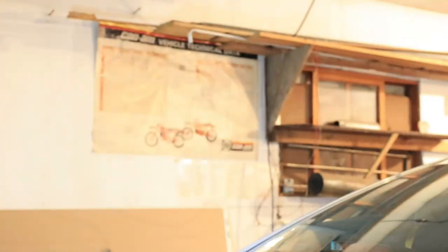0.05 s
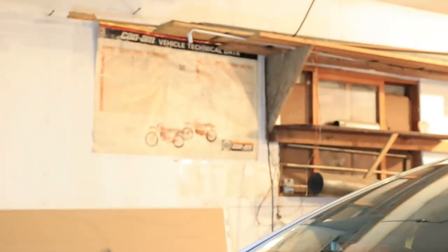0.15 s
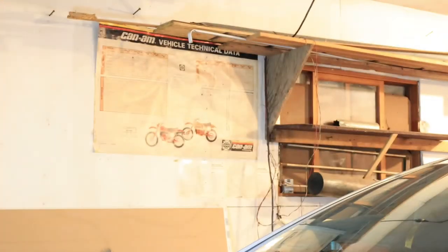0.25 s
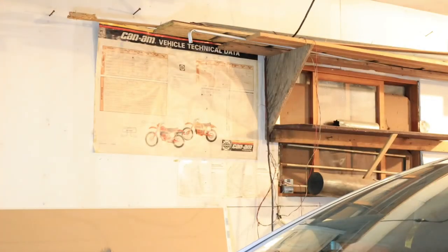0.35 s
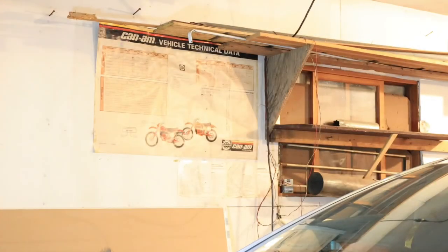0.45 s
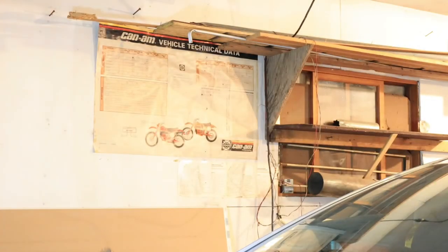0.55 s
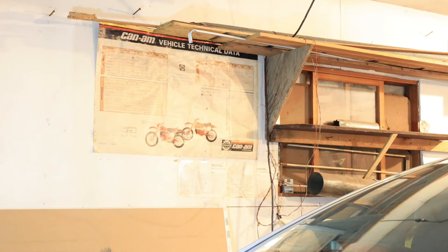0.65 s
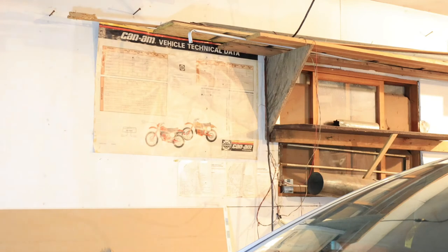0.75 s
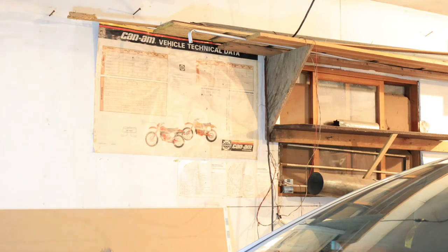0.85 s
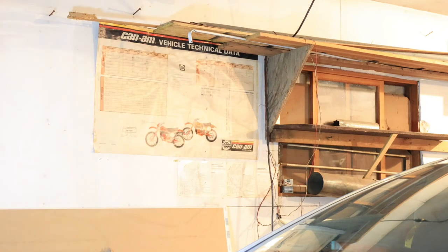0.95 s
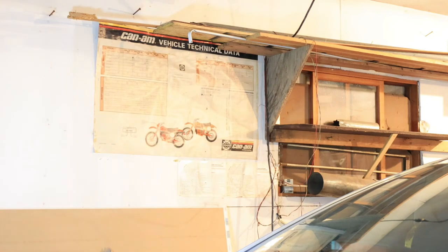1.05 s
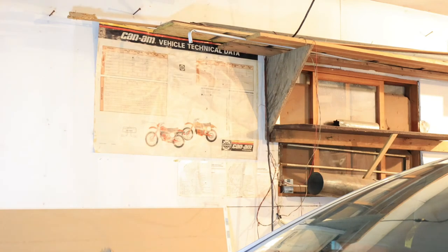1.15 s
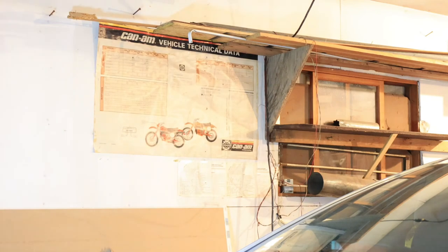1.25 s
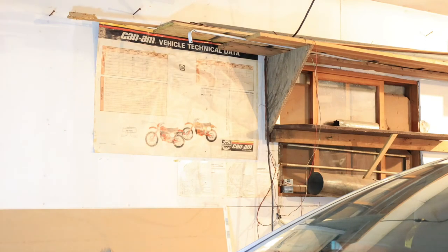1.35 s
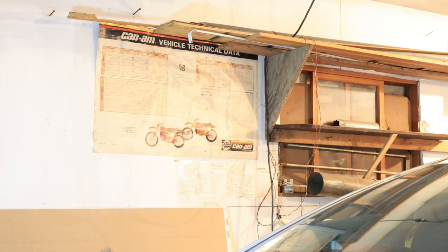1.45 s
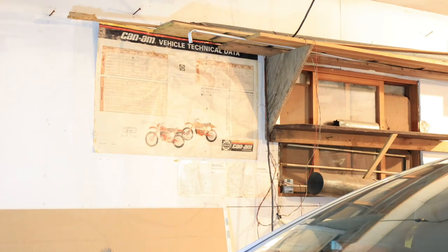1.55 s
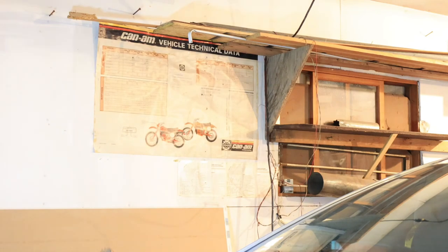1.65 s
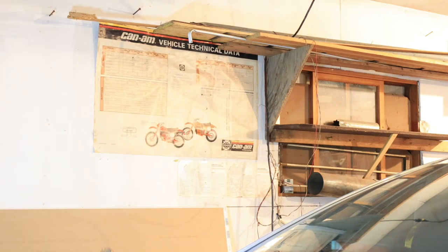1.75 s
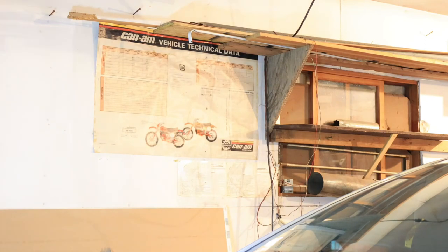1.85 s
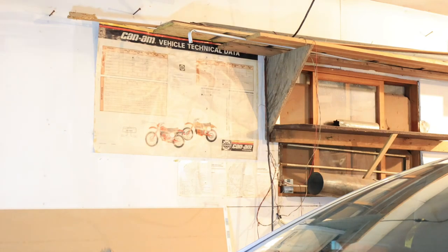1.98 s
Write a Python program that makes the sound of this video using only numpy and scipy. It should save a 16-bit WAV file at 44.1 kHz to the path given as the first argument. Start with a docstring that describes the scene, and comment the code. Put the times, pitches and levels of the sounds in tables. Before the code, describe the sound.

A car trunk lid slams almost at once after a faint rush of air: sharp latch clack, deep body thud, quick loose rattle, then short garage echo and near silence, picked up by one microphone in the left channel.

```python
"""In a quiet garage, a car trunk lid swings down and slams; room tone, rumble and thin hisses lie behind it.
The background is coloured noise, and the rush before the slam is noise with a drawn level.
Latch and loose part are bursts of dense clicks; the lid is a row of soft pushes that ring its panels.
A noise tail gives the garage echo. One microphone feeds the left channel;
the right holds preamp hiss and a faint bassy leak of the left."""
import sys
import numpy as np
from scipy import signal
from scipy.fft import rfft, irfft, next_fast_len
from scipy.io import wavfile
from scipy.ndimage import uniform_filter1d

SR = 44100
rng = np.random.default_rng(int(sys.argv[2]) if len(sys.argv) > 2 else 0)


def master_out(mix):
    """Clip the mix to full scale and print it as 16-bit PCM to the path in sys.argv[1]."""
    frames = np.transpose(np.atleast_2d(mix))
    ceiling = np.clip(frames, -1, 1)
    pcm = np.round(ceiling * 32767).astype(np.int16)
    wavfile.write(sys.argv[1], SR, pcm)


N = 88200
T = np.arange(N) / SR  # time in s


def undb(db):
    """Amplitude factor of a level in dB."""
    return 10 ** (np.asarray(db, float) / 20)


def table(hz, points, col=1):
    """Column of a table read on a log-frequency axis."""
    p = np.array(points, float)
    return np.interp(np.log(np.maximum(hz, 1)), np.log(p[:, 0]), p[:, col])


def colour(x, points):
    """Equalise a sound by (freq_hz, gain_db) points."""
    size = next_fast_len(len(x) + 4096)
    gain = undb(table(np.fft.rfftfreq(size, 1 / SR), points))
    return irfft(rfft(x, size) * gain, size)[:len(x)]


def unit(x):
    """Scale to an RMS of 1."""
    return x / np.sqrt(np.mean(x ** 2))


def noise(points):
    """Coloured noise with an RMS of 1."""
    return unit(colour(rng.standard_normal(N), points))


def curve(rows):
    """Amplitude drawn by straight dB lines through (time_s, level_db) rows."""
    r = np.array(rows, float)
    return undb(np.interp(T, r[:, 0], r[:, 1]))


def walk(rate):
    """Slewed random levels, rate steps a second, spread 1."""
    k = int(SR / rate)
    steps = np.repeat(rng.standard_normal(N // k + 1), k)
    return unit(uniform_filter1d(steps, k)[:N])


# colour of the room tone: freq_hz, gain_db
ROOM_TONE_COLOUR = [(20, -14), (60, -11), (120, -5.5), (195, 0), (290, -12), (360, -4), (470, -11),
                    (560, -9), (1200, -15.5), (2500, -23.5), (4000, -22.5), (7000, -45)]
ROOM_TONE_DB = -73  # RMS before the mic gain


def room_tone():
    """Steady garage air: noise weighted toward the low end."""
    return noise(ROOM_TONE_COLOUR) * undb(ROOM_TONE_DB)


# colour of small movements of cloth and car: freq_hz, gain_db
STIR_COLOUR = [(59, -30), (100, 0.5), (401, -9), (564, -0.5), (768, -17.5), (1350, -8), (2220, -20.5),
               (3590, -18), (6000, -30.5), (7800, -60.5), (13200, -120)]
# their loudness: time_s, level_db (before the mic gain)
STIR_LEVEL = [(.3, -89.5), (.6, -70), (.75, -64), (.8, -59.5), (.95, -70), (.995, -64.5), (1.1, -73),
              (1.22, -83.5), (1.3, -76), (1.45, -101), (1.55, -77), (1.65, -71), (1.75, -79.5), (1.9, -82),
              (2, -79.5)]


def stirring():
    """Small movements of cloth and car: friction noise that swells and sinks."""
    return noise(STIR_COLOUR) * curve(STIR_LEVEL)


# band of the low rumble, strongest at 83 Hz: freq_hz, gain_db
RUMBLE_COLOUR = [(30, -14), (65, -10), (83, 1), (100, -9.5), (140, -27), (500, -89.5)]
# its loudness: time_s, level_db (before the mic gain)
RUMBLE_LEVEL = [(0, -71.5), (.12, -82.5), (.38, -58.5), (.65, -65), (.9, -67.5), (1.05, -70), (1.25, -74),
                (1.45, -68), (1.58, -75.5), (1.7, -63.5), (1.8, -64), (1.85, -69.5), (2, -66)]


def rumble():
    """Low rumble: a narrow band of noise with a drawn level."""
    return noise(RUMBLE_COLOUR) * curve(RUMBLE_LEVEL)


# faint narrow hisses and hums: start_s, length_s, centre_hz, width_hz, level_db (before the mic gain)
WHISPS = [(0, .1, 122.5, 24.3, -60.5), (0.037, 0.031, 3550, 517, -66), (.085, .08, 3297, 250, -78),
          (.085, .08, 2520, 200, -78), (0.658, 0.32, 3610, 301, -78), (0.717, 0.067, 4470, 240, -71),
          (0.784, 0.23, 1420, 200, -75.5), (0.768, 0.089, 549, 128, -73.5), (.96, .08, 560, 120, -73),
          (1.608, .06, 325, 99.5, -71), (1.51, 0.068, 1950, 201.5, -81.5), (1.764, 0.083, 4180, 400, -80.5),
          (1.783, 0.12, 3760, 400, -80.5), (1.8, 0.1, 3200, 446, -79.5)]
WHISP_WAVER_DB, WHISP_STEPS_PER_S = 2.5, 39.9


def whisps():
    """Narrow bands of noise that arch up and away while their level wavers."""
    out = np.zeros(N)
    for start_s, length_s, hz, width_hz, level_db in WHISPS:
        band = noise([(hz - 2 * width_hz, -60), (hz - width_hz / 2, 0),
                      (hz + width_hz / 2, 0), (hz + 2 * width_hz, -60)])
        level = undb(level_db + WHISP_WAVER_DB * walk(WHISP_STEPS_PER_S))
        arch = np.sin(np.pi * np.clip((T - start_s) / length_s, 0, 1))
        out += level * band * np.sqrt(arch + 1e-12)  # the tiny offset keeps the root real
    return out


# colour of the air pushed by the falling lid: freq_hz, gain_db
RUSH_COLOUR = [(59, -30.5), (100, -1.5), (147, -1), (193, -14.5), (279, -3), (698, -5.5), (919, -2.5),
               (1480, -15.5), (3320, -13), (8000, -40.5), (10400, -71.5), (17600, -120)]
# its loudness: time_s, level_db (before the fade and the mic gain)
RUSH_LEVEL = [(0, -62), (.04, -69), (.08, -62), (.115, -59.5), (.15, -60.5), (.162, -51.5)]


def air_rush():
    """Air pushed by the falling lid: turbulent noise, faded out from 0.17 to 0.2 s."""
    fade = np.clip((.2 - T) / .03, 0, 1)
    return noise(RUSH_COLOUR) * curve(RUSH_LEVEL) * fade


# echo of the garage: freq_hz, t60_s, level_db (relative)
GARAGE = [(60, 0.67, -11.5), (125, 0.63, -10.5), (252, .75, -8.5), (508, 0.91, -7), (1000, 0.73, -3.5),
          (2000, 0.81, -6), (2770, 0.52, -5.5), (3984, .68, -2), (5500, .48, -6), (8000, .38, -7.5),
          (13880, .27, -10)]
GARAGE_RISE_S = .008


def garage(x):
    """Diffuse echo: noise that builds up and dies away at its own pace in each half-octave band."""
    t = T[:int(1.3 * SR)]
    tail = 0
    for hz in 40 * 2 ** np.arange(0, 8.6, .5):
        band_pass = signal.butter(2, [hz / 1.19, hz * 1.19], "band", fs=SR, output="sos")
        band = signal.sosfilt(band_pass, rng.standard_normal(len(t)))
        t60 = table(hz, GARAGE)
        decay = undb(table(hz, GARAGE, col=2) - 60 * t / t60)
        tail = tail + band * decay / np.sqrt(t60 * SR / 14)  # offsets the extra energy of long decays
    rise = 1 - np.exp(-t / GARAGE_RISE_S)
    return signal.fftconvolve(x, tail * rise)[:N]


# contacts of latch and loose part: start_s, level_db (before the mic gain),
# decay_s (time constant, held to 0.001 or more), tilt_db_per_octave (brightness)
CLACKS = [(0.043, -55, 0.0054, 9), (.164, -31.5, 0.006, -4.5), (0.17, -34, 0.015, -2),
          (.178, -19, 0.012, -1.5), (0.1853, -13.5, 0.0059, 1.5), (0.1932, -33, 0.00587, -3.5),
          (0.1998, -23, 0.019, 0.5), (0.2101, -21.5, 0.013, -3), (0.2416, -22, 0.0089, 4),
          (.2544, -23, 0.009, -4.5), (0.2963, -24.5, 0.0054, 2), (0.3047, -24.5, 0.0034, 1.5),
          (0.3482, -28, 0.011, 0.5), (0.3569, -27, 0.006, -2), (0.394, -34, 0.0058, -0.5),
          (0.4428, -45, 0.0055, -9), (0.4855, -37.5, 0.0078, -3), (0.5207, -56, 0.001, 2),
          (0.5292, -41.5, 0.0071, -2), (0.983, -61.5, 0.0087, 2.5), (1.278, -69, 0.0099, 4),
          (1.9874, -65, .004, 14)]
# shared colour of the metal: freq_hz, gain_db
CLACK_COLOUR = [(150, -24), (350, -0.5), (900, -3), (2000, -6), (3500, -11), (5000, -21), (8000, -28),
                (15500, -46)]
CLICKS_PER_S, CLICK_SCATTER_DB = 14000, 1.5


def clacks():
    """Latch and loose part: each contact is a short burst of dense metal clicks."""
    scatter = undb(CLICK_SCATTER_DB * rng.exponential(size=N))
    hits = rng.random(N) < CLICKS_PER_S / SR
    clicks = rng.standard_normal(N) * scatter * hits
    out = np.zeros(N)
    for start_s, level_db, decay_s, tilt_db in CLACKS:
        i = int(start_s * SR)
        t = T[:min(N - i, SR // 10)] / max(decay_s, .001)  # time in decay constants
        shape = (1 - np.exp(-8 * t)) * np.exp(-t)
        metal = colour(clicks[i:i + len(t)] * shape, CLACK_COLOUR)
        burst = colour(metal, [(250, -3 * tilt_db), (16000, 3 * tilt_db)])
        # match the burst's energy to its envelope, so colour does not alter the level
        match = np.sqrt(np.sum(shape ** 2) / np.sum(burst ** 2))
        out[i:i + len(t)] += undb(level_db) * burst * match
    return out


# blows of the lid on seal and body: start_s, level_db (before the mix and mic gains), contact_s
BLOWS = [(.003, -48.5, 0.0035), (0.164, -29.5, 0.0008), (.167, -28.5, 0.00096), (0.175, -25.5, 0.0022),
         (.1865, -13, 0.00084), (0.1906, -14.5, 0.0016), (0.2003, -12, 0.0018), (0.206, -10.5, .0018),
         (.2148, -8.5, .0014), (0.217, -13.5, .0016), (0.2378, -8.5, 0.0023), (0.2433, -8, .0015),
         (0.2497, -15, .0015), (0.2667, -18.5, .002), (0.2724, -13, 0.002), (.279, -20, 0.0013),
         (0.3001, -22, 0.00127), (.325, -25, 0.00162), (0.336, -25.5, 0.00193), (0.3562, -28, 0.0011),
         (.378, -29, 0.0027), (.55, -50, 0.0014), (0.791, -51.5, 0.00081), (0.995, -50.5, 0.0022)]
# ringing panels of lid and body: pitch_hz, level_db (relative), t60_s
PANELS = [(34, -3, 0.39), (76.6, -6, .3), (120.5, -11, .2), (167.7, -0.5, 0.17), (202, -4, 0.23),
          (254.6, -2, 0.27), (333, -0.5, .15), (371.2, -5, .2), (414, -5, 0.14), (487, -4.5, 0.303),
          (560.4, -0.5, 0.19), (628.2, -7, .25), (938, -3.5, 0.75), (1240, -3, .2)]
PUSH_DB, RING_DB = -2, -37.5  # mix of direct push and panel ring
PUSH_LOW_HZ = 107  # bass cut of the direct push


def lid():
    """Lid meets seal and body: soft pushes are heard directly and ring the damped panels."""
    push = -sum(undb(level_db) * np.exp(-((T - start_s - contact_s) / (contact_s / 2)) ** 2)
                for start_s, level_db, contact_s in BLOWS)
    ring = 0
    for hz, level_db, t60 in PANELS:
        r = np.exp(-np.log(1000) / (t60 * SR))  # decay per sample
        w = 2 * np.pi * hz / SR
        resonator = [1, -2 * r * np.cos(w), r * r]
        ring = ring + undb(level_db) * signal.lfilter([np.sin(w) * hz / 1000], resonator, push)
    bass_cut = signal.butter(2, PUSH_LOW_HZ, "high", fs=SR, output="sos")
    return undb(PUSH_DB) * signal.sosfilt(bass_cut, push) + undb(RING_DB) * ring


# leak of the left channel into the right: freq_hz, gain_db (right relative to left)
LEAK = [(60, -37.5), (200, -40.5), (700, -50), (2400, -53.5), (8000, -56.5)]
MIC_DB = 6  # gain on the whole mix


def scene():
    """Slam, its echo and the background at one microphone, with a leak to the right."""
    background = room_tone() + stirring() + rumble() + air_rush() + whisps()
    slam = clacks() + lid()
    mic = undb(MIC_DB) * (slam + garage(slam) + background)
    return np.array([mic, colour(mic, LEAK)])


# colour of the preamp hiss: freq_hz, gain_db
HISS_COLOUR = [(30, -1), (200, -9), (1000, -13), (2500, -17.5), (6000, -18.5), (15000, -23.5)]
HISS_LEFT_DB, HISS_RIGHT_DB = -75, -73  # RMS before the top cut
TOP_HZ = 15780


def record(dry):
    """Bass roll-off, rounded peaks, preamp hiss on each channel and a steep top cut."""
    bass_cut = signal.butter(2, 24., "high", fs=SR, output="sos")
    x = signal.sosfilt(bass_cut, dry)
    rounded = np.tanh(.8 * x) / .8
    hiss = np.array([undb(HISS_LEFT_DB) * noise(HISS_COLOUR), undb(HISS_RIGHT_DB) * noise(HISS_COLOUR)])
    top_cut = signal.ellip(12, .2, 80, TOP_HZ, fs=SR, output="sos")
    return signal.sosfilt(top_cut, rounded + hiss)


dry = scene()
out = record(dry)
master_out(out)
```